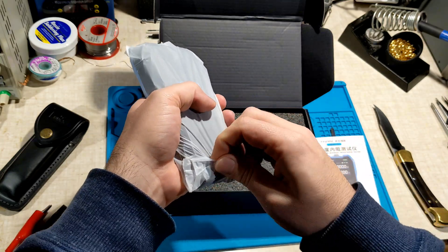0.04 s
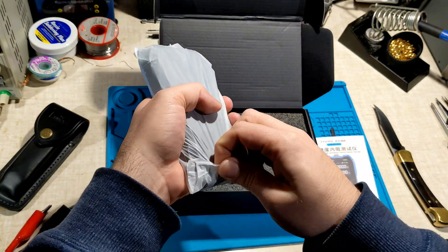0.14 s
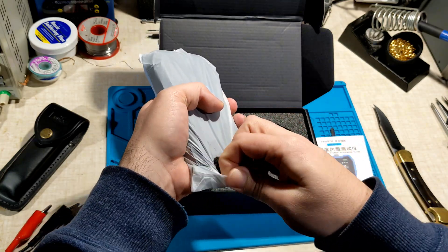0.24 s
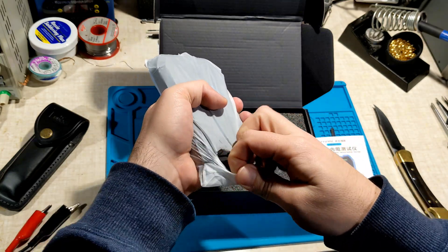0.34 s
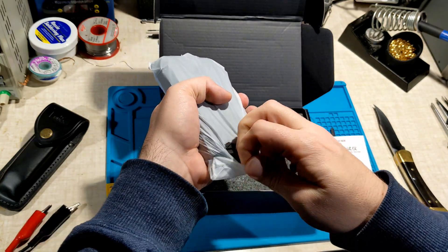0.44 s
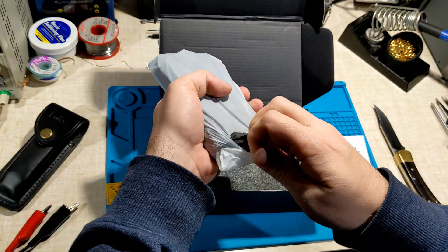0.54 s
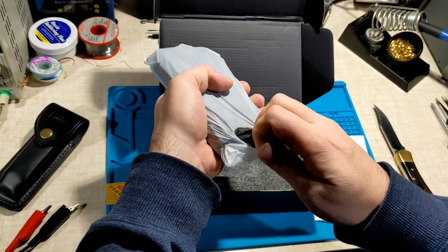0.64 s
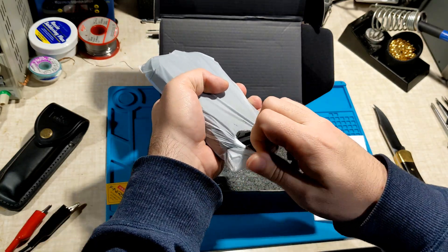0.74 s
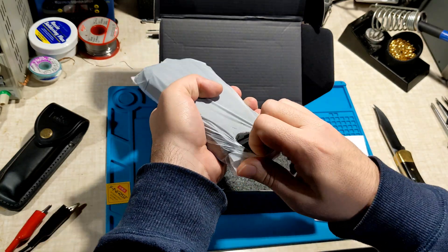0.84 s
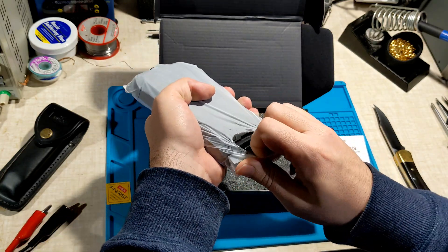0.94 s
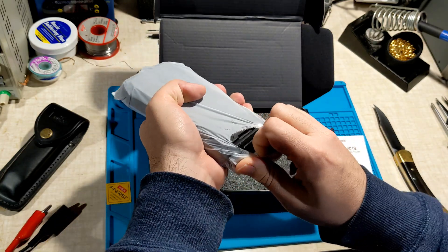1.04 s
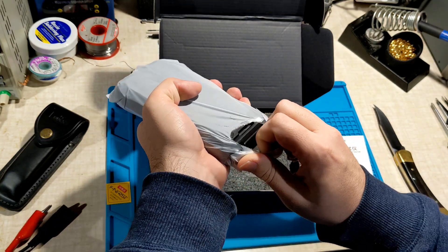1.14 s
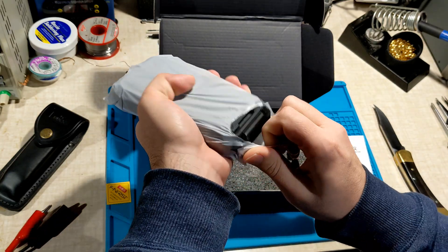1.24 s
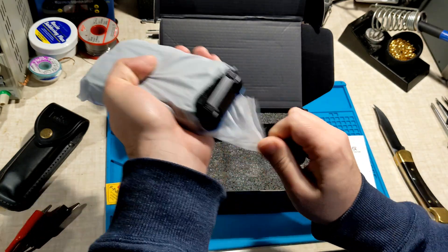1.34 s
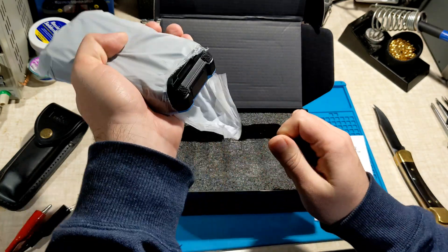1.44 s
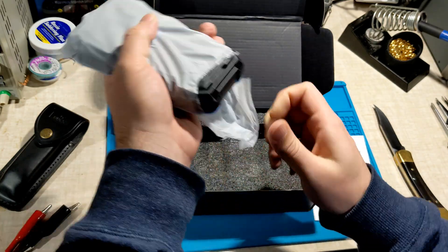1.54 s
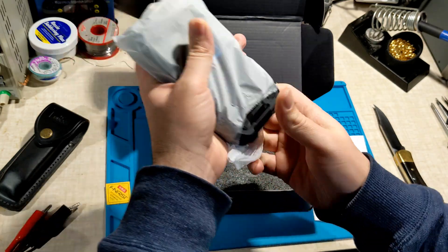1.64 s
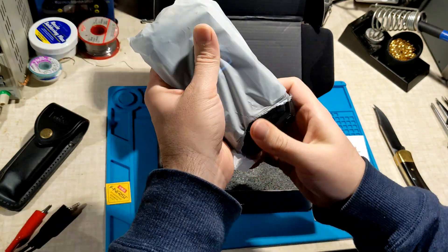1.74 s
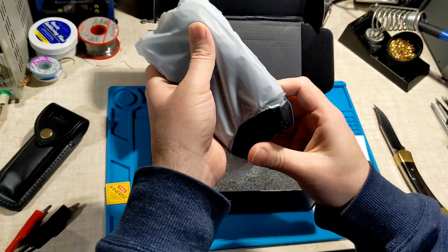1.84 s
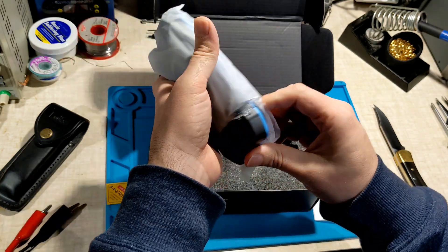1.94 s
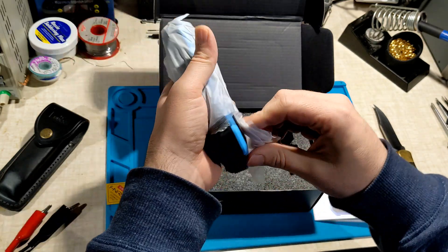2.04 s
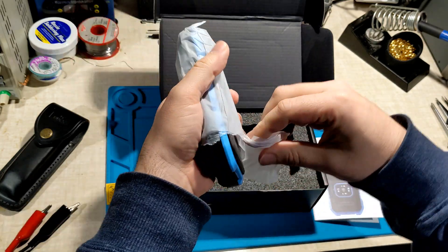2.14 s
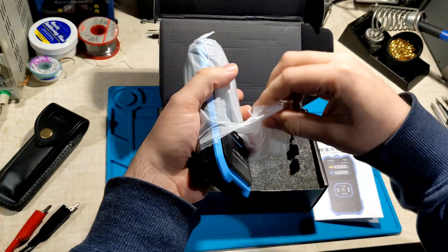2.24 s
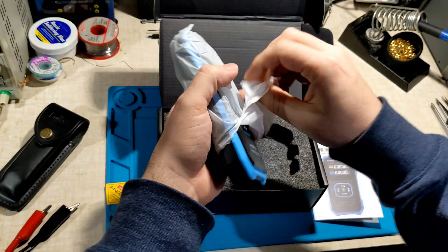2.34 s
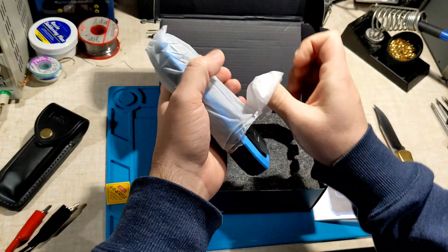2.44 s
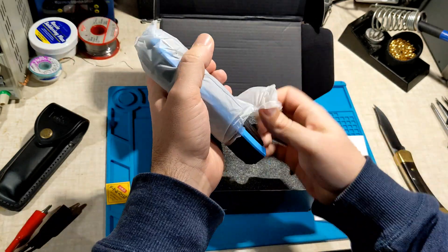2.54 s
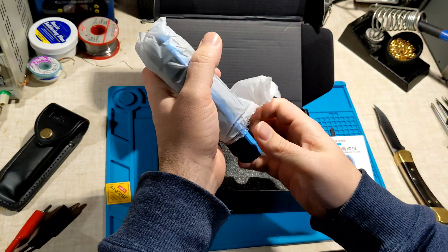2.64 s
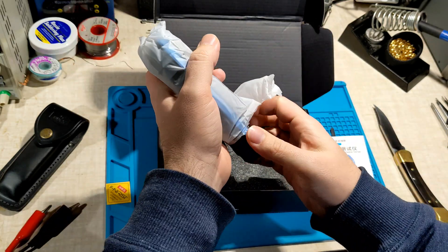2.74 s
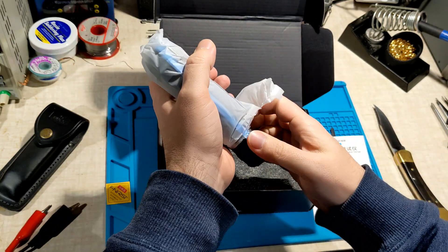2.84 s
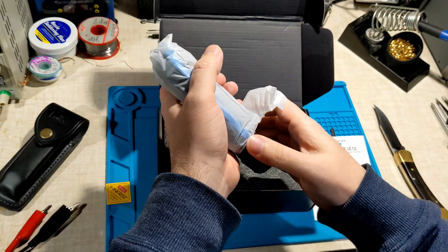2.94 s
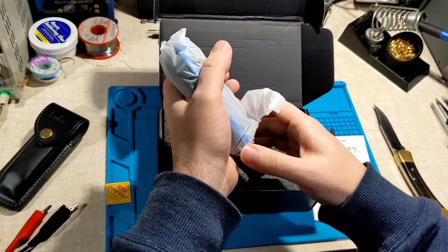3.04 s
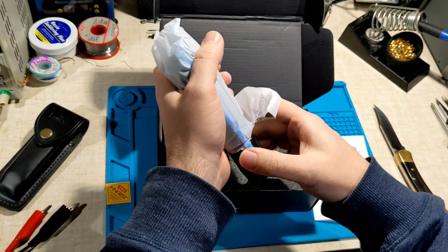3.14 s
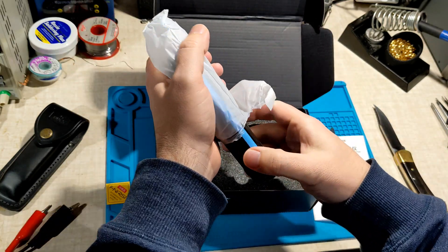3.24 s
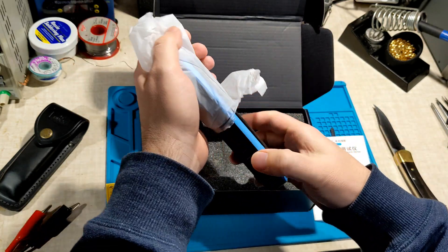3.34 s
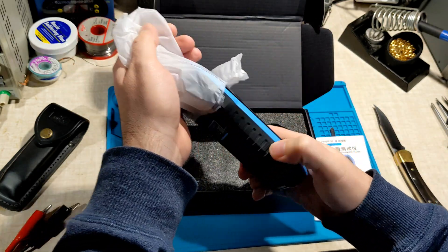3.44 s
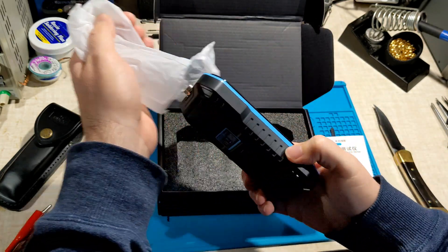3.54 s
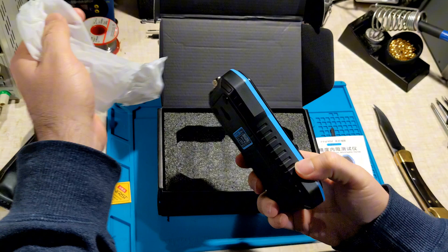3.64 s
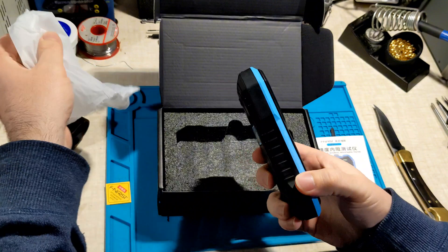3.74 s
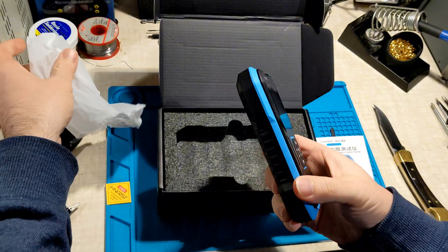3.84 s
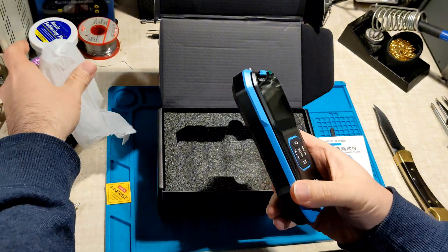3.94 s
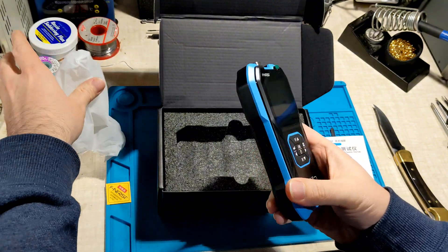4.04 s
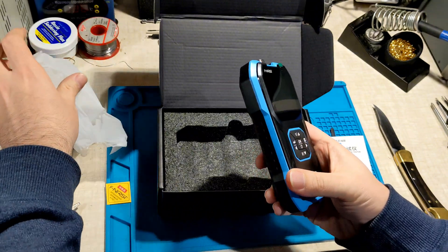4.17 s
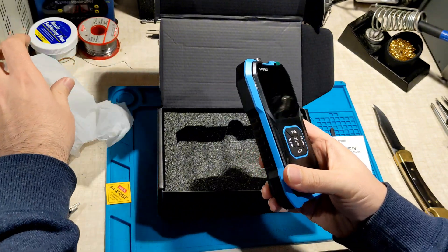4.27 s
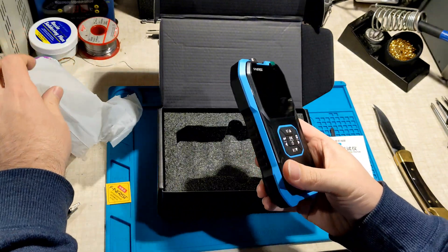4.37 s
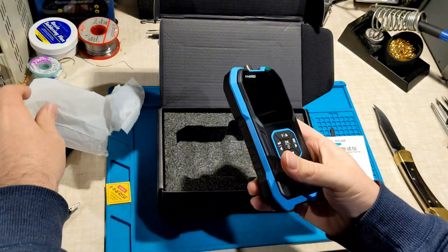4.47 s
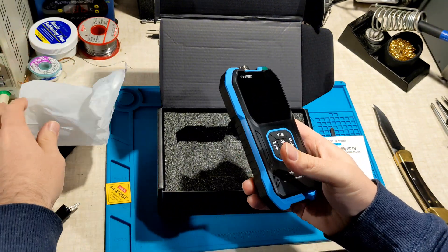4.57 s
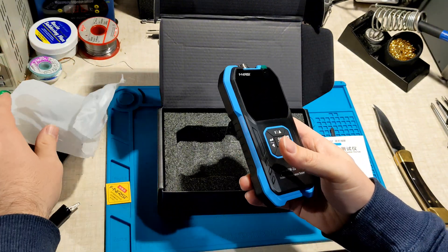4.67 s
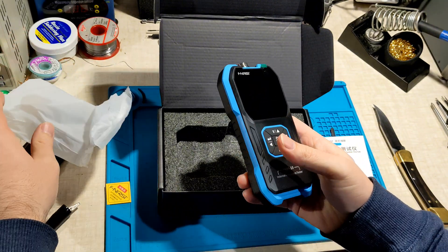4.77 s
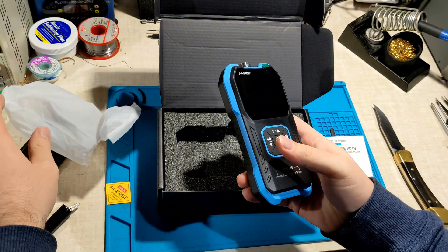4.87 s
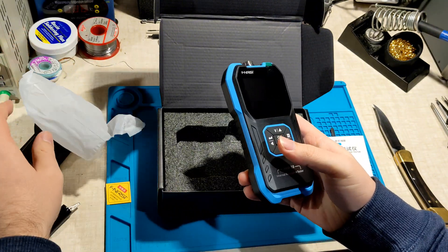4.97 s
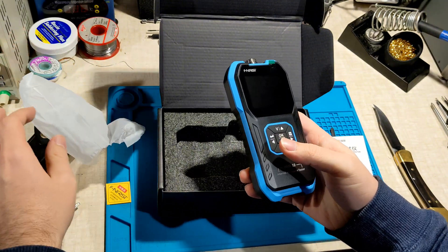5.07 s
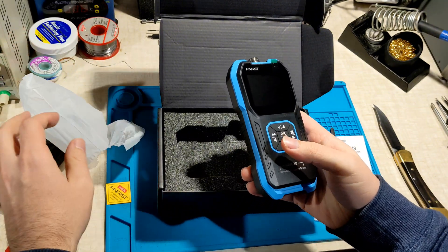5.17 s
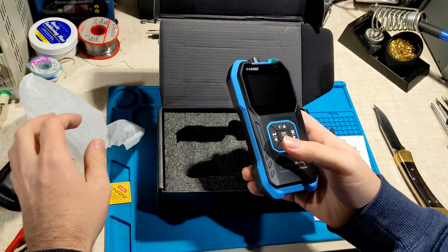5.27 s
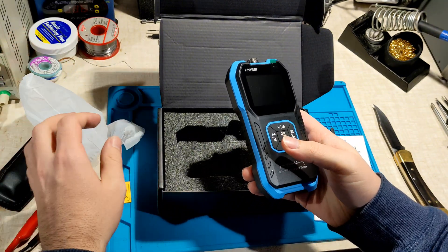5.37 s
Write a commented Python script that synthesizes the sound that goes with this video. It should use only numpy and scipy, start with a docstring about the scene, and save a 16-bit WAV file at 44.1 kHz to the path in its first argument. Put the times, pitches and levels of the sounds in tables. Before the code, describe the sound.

Close to a stereo microphone over a desk in a quiet room, hands work at thin plastic wrapping. Scattered crinkles and small taps on a hard case lead to one popping tear. Busy crackling follows as the plastic is pulled back, the stretched sheet drumming low beneath it. A bright sliding swish frees the device inside, and the rustling thins out as the empty bag is put down.

```python
"""Soft crinkles first: fingers pick at a thin plastic bag over a desk. It rips open with a pop, the film
is peeled back, a handheld meter slides out and the bag is laid aside. Tiny creases buckle and crackle
over the hiss of sliding film, bigger folds snap, the stretched sheet drums low and fingers knock on
the meter's case. All of it sits close to a stereo microphone in a small, quiet room."""
import sys
import numpy as np
from scipy import signal
from scipy.fft import rfft, irfft
from scipy.io import wavfile
from scipy.ndimage import uniform_filter1d

SR = 44100
rng = np.random.default_rng(int(sys.argv[2]) if len(sys.argv) > 2 else 0)


def pcm_store(signal):
    """Save signal as 16-bit PCM."""
    levels = np.round(np.clip(np.atleast_2d(signal), -1, 1) * 32767)
    wavfile.write(sys.argv[1], SR, levels.astype(np.int16).T)


N = 238581

# EQ of the room tone: f/Hz, level/dB
ROOM_TONE_EQ = [(20, -21), (65, 2.5), (100, -4), (200, -11), (400, -17.5), (1000, -18), (3000, -22.5),
                (16000, -21)]
# fader for the dull rub of gripping fingers: t/s, level/dB
GRIP_FADER = [(0, -62), (.65, -60.5), (1.0, -97), (1.45, -74), (1.9, -97)]
# EQ of that rub: f/Hz, level/dB
GRIP_EQ = [(25, -25), (70, -2.5), (170, -10.5), (600, -20)]
# finger knocks on the meter's case: t/s, peak level/dB
KNOCK_CUES = [(0.349, -37), (0.591, -36), (3.774, -58), (3.797, -49), (3.834, -49), (4.58, -62)]
# modes of the case: f/Hz, relative level/dB, t60/s
CASE_MODES = [(580, -19, 0.16), (864, 0.5, 0.066), (1160, -4, 0.065), (1304, 12, 0.043)]
# modes of a small hard thing on the desk: f/Hz, relative level/dB, t60/s
TINK_MODES = [(2230, 1, 0.052), (2550, -19, 0.048)]
# pull on the sheet: t/s, tautness/0-1, drumming level/dB relative to the hands' effort
SHEET_TENSION = [(0, 0.14, -20.5), (.3, 0.9, -20), (.85, 0.9, -20.5), (1.37, 0.53, -19),
                 (1.44, 0.28, -12.5), (1.62, 0.62, -20), (2.05, 0.65, -25.5), (2.25, 0.93, -12.5),
                 (2.55, 0.61, -25.5), (3.0, 0.7, -18.5), (3.25, 0.73, -27.5), (3.6, 0.23, -19.5),
                 (4.7, 0.19, -21.5)]
# EQ of the taut sheet: f/Hz, level/dB
TAUT_EQ = [(150, -40), (410, -7.5), (500, 6.5), (570, 0), (635, 2), (720, -3.5), (830, 1), (1020, -14),
           (2500, -35)]
# EQ of the slack sheet: f/Hz, level/dB
SLACK_EQ = [(60, -20.5), (140, -14), (230, 1), (330, -3.5), (850, -10), (1020, -11.5), (2500, -28.5)]
# EQ of the film at the two microphone ports: f/Hz, left level/dB, right level/dB
FILM_EQ = [(302, -32.5, -31.5), (857, -13, -25), (980, -21.0, -20.0), (1264, -9.5, -11.5),
           (2210, -8.0, -6.0), (3450, -4.5, -5), (4000, -5.5, -5.0), (6300, -4.5, -3.5), (7390, -1.5, 2.0),
           (7130, -4.5, -3.5), (8820, -0.5, -0.5), (10980, -4, -4.0), (11440, -0.5, 2.0),
           (16000, 3.5, -5.5), (15250, -12.0, -27.5)]
# big folds snapping and film giving way: t/s, level/dB, brightness/dB
SNAP_CUES = [(0.0629, -60, -19), (0.2494, -48.5, -5), (0.2623, -40.5, -8), (0.289, -49, 3),
             (0.3244, -48, -9), (0.5523, -53, -18), (0.5896, -40, 2.5), (0.7022, -50, 6), (0.7283, -46, 4),
             (0.773, -40.5, -6.5), (0.9031, -43, 0), (1.0318, -49.5, -4), (1.1191, -43.5, 10),
             (1.2471, -54, 24), (1.2978, -47, 0), (1.3545, -36, 3), (1.4037, -32.5, 14), (1.4201, -24, -5),
             (1.8902, -39, -3.5), (1.9608, -34, -2), (2.0661, -33.5, 2), (2.1864, -37, 1), (2.2222, -34, 5),
             (2.2701, -30.5, 0), (2.349, -33.5, -16), (2.423, -37.5, 0), (2.5809, -40.5, 13),
             (2.7172, -46, 4), (2.79, -41.5, 6), (2.828, -40, 7), (2.9959, -46, 27), (3.0941, -51, 11),
             (3.6997, -41.5, 32), (3.7736, -43, -6), (3.8327, -43.5, -11), (4.113, -47, -10),
             (4.239, -59.5, -12), (4.311, -53.5, -5), (4.4445, -56, -3.5), (4.5799, -50, -16),
             (4.612, -56.5, -8)]
# fader for the faint rustle of the bag just being held: t/s, level/dB
HOLDING_FADER = [(0, -58), (0.3, -57), (1.25, -67.5), (1.55, -63.5), (2.3, -52), (2.66, -53.5), (2.76, -64),
                 (3.85, -63), (4.3, -72.5), (4.65, -66.5), (5.15, -82.5)]
# hand moves, each a burst of rustle: t/s, length/s, level/dB, brightness/dB
# (picking, the rip at 1.3 s, peeling from 1.6, a new grip at 2.8, meter out at 3.1, bag aside at 3.8)
MOVE_CUES = [ (0.043, 0.029, -41, -7), (0.136, 0.083, -54, -12), (0.274, 0.07, -37.5, -4),
             (0.425, 0.055, -50, 1), (0.506, 0.11, -51, -8.5), (0.752, 0.049, -52, -4.5),
             (0.84, 0.13, -51, -4), (1.144, 0.034, -53, -1.5), (1.308, 0.061, -32.5, 2),
             (1.324, 0.1, -35, -4), (1.58, 0.03, -34, 3.5), (1.626, 0.086, -42.5, -1),
             (1.684, 0.095, -35, 0), (1.819, 0.059, -47, -5.5), (1.887, 0.095, -39.5, -3.5),
             (1.984, 0.087, -38.5, -3.5), (2.12, 0.099, -43, 0), (2.214, 0.13, -36, -1),
             (2.358, 0.095, -43, -3), (2.443, 0.083, -38.5, -1.5), (2.567, 0.081, -44, -2.5),
             (2.786, 0.037, -49, 5), (2.872, 0.07, -52, 2), (2.967, 0.07, -53, 2),
             (3.146, 0.19, -39.5, 2.5), (3.335, 0.215, -36.5, 3.5), (3.767, 0.088, -48.5, -0.5),
             (3.908, 0.15, -58, -4), (4.129, 0.025, -53.5, -7.5), (4.425, 0.079, -66, 2),
             (4.513, 0.056, -53.5, -6), (4.694, 0.0299, -58, -4), (5.017, 0.02, -60.5, -7)]
# crossfade from buckling to sliding: t/s, hiss share of the power/0-1
SLIDE_MIX = [(0, 0), (1.4, 0.25), (3.05, 0.28), (3.2, 0.76), (3.55, 0.19), (3.8, 0.28)]
# the bag's hollow rings, shifting as it opens and empties: t/s, f/Hz, boost/linear (0 = none)
HOLLOW_SWEEP = [(0, 3040, 0.47), (.35, 2180, 0.25), (1.4, 1910, 0.17), (2.9, 2380, 0.28),
                (3.25, 3300, 0.96), (3.52, 1911, 0.99), (4.2, 2265, 0.58)]

TOP_HZ = 15950


def undb(db):
    """Decibels to gain."""
    return 10 ** (np.asarray(db) / 20)


def curve(table):
    """Each column of a table as straight ramps over time."""
    s, *columns = np.transpose(table)
    return [np.interp(np.arange(N) / SR, s, c) for c in columns]


def add(out, s, sound):
    """Mix a sound in at time s."""
    i = int(s * SR)
    out[:, i:i + sound.shape[-1]] += sound[..., :N - i]


def eq(x, hz, db, size=4096):
    """Minimum-phase EQ through f/Hz, level/dB points that keeps the power of white noise."""
    f = np.maximum(np.arange(size // 2 + 1) * SR / size, 1)
    gain = undb(np.interp(np.log(f), np.log(hz), db))
    gain /= np.hypot(1, (f / (TOP_HZ + 500)) ** 40)  # steep high cut
    cepstrum = irfft(np.log(gain / np.sqrt(np.mean(gain ** 2))))
    cepstrum[1:size // 2] *= 2
    cepstrum[size // 2 + 1:] = 0
    impulse = irfft(np.exp(rfft(cepstrum)))
    return np.apply_along_axis(signal.fftconvolve, -1, x, impulse)[..., :N]


def brighten(x, db, split_hz=4500):
    """Tilt the power between the bands below and above the split."""
    low = signal.filtfilt(*signal.butter(2, split_hz, fs=SR), x)
    return (low + undb(db) * (x - low)) / np.sqrt(.14 + .86 * undb(db) ** 2)


def resonance(x, hz, width_hz):
    """One-pole ring with a swept centre, gain about 1 there."""
    turn = np.exp(2j * np.pi * np.cumsum(hz) / SR)
    keep = np.exp(-np.pi * width_hz / SR)
    return 2 * np.real(signal.lfilter([1 - keep], [1, -keep], x / turn) * turn)


def leveller(x, span_s):
    """Ride the power to about 1 over a span; faster transients stay."""
    power = uniform_filter1d(np.mean(x ** 2, axis=0), int(span_s * SR))
    return x / np.sqrt(np.maximum(power, 0) + np.mean(x ** 2) / 100)


def flicker(rate_hz, depth_db):
    """A gain that wanders at random."""
    hold = max(int(SR / rate_hz), 1)
    steps = np.repeat(rng.standard_normal(N // hold + 1), hold)
    return undb(depth_db * uniform_filter1d(steps, hold)[:N])


def port_noise(alike_hz, size=N):
    """Noise at two close microphone ports: mono in the bass, wide in the treble."""
    mid, side = rng.standard_normal((2, size))
    side = signal.sosfilt(signal.butter(1, alike_hz, "high", fs=SR, output="sos"), side)
    return np.array([mid + side, mid - side]) / np.sqrt(2)


def room_tone(db):
    """The bed: a faint, bass-heavy hush."""
    return eq(port_noise(alike_hz=164), *np.transpose(ROOM_TONE_EQ)) * undb(db)


def room_reverb(x, tail_db, t60, size=16384):
    """Early reflections off an open box and the desk, then a faint short tail from the walls."""
    t = np.arange(size) / SR
    envelopes = np.exp(-t / .008) * (t > .001), undb(-60 * t / t60) * (t > .006)
    early, tail = (port_noise(alike_hz=1180, size=size) * e / np.linalg.norm(e) for e in envelopes)
    # small things throw back only the short waves
    early = undb(-7.5) * signal.lfilter(*signal.butter(2, 700, "high", fs=SR), early)
    return x + signal.fftconvolve(x, early + undb(tail_db) * tail, axes=1)[:, :N]


def scatter(x, db, decay_s):
    """Moving film and desk clutter leave a brief, ever-changing tail behind each click."""
    keep = np.exp(-2 / (decay_s * SR))
    power = signal.lfilter([0, 1 - keep], [1, -keep], np.mean(x ** 2, axis=0) + 1e-18)
    return x + undb(db) * np.sqrt(power) * port_noise(alike_hz=1480, size=len(power))


def knock(modes, size=8192):
    """One blow rings a hard object's modes, each slightly detuned; peak 1."""
    t = np.arange(size) / SR
    ring = 0
    for hz, db, t60 in modes:
        detune = 1 + rng.normal() / 100
        ring += undb(db - 60 * t / t60) * np.sin(2 * np.pi * hz * detune * t)
    return ring / np.abs(ring).max()


def touches(tink_s, tink_db):
    """Fingers rub and knock the meter's case; the hand tinks a small hard thing on the desk."""
    out = eq(port_noise(alike_hz=198.2), *np.transpose(GRIP_EQ)) * undb(curve(GRIP_FADER)[0])
    for s, db in KNOCK_CUES:
        add(out, s, undb(db) * knock(CASE_MODES))
    add(out, tink_s, undb(tink_db) * knock(TINK_MODES))
    return out


def sheet_drum(effort_db, pan_right_db):
    """Uneven tugs drum the film: a hollow note when taut, a low flutter when slack."""
    taut, drum_db = curve(SHEET_TENSION)
    taut, out = np.clip(taut, 0, 1), 0
    for share, spectrum in ((taut, TAUT_EQ), (1 - taut, SLACK_EQ)):
        tugs = leveller(port_noise(alike_hz=1970) * flicker(rate_hz=160, depth_db=5.5), span_s=0.044)
        out += eq(tugs * np.sqrt(share) * undb(effort_db + drum_db), *np.transpose(spectrum))
    return out * undb([[-pan_right_db], [pan_right_db]])


def rip_pop(s, db, taut_hz, slack_hz, fall_s, decay_s, size=6000):
    """The end of the bag rips off: the sheet pops, its pitch diving as the tension goes."""
    out, t = np.zeros((2, N)), np.arange(size) / SR
    hz = slack_hz + (taut_hz - slack_hz) * np.exp(-t / fall_s)
    add(out, s, undb(db) * np.exp(-t / decay_s) * np.sin(2 * np.pi * np.cumsum(hz) / SR))
    return out


def hand_envelopes(attack_s=0.034, release_s=0.024, typical_move_s=0.1, holding_bright_db=-9):
    """Level/dB and brightness/dB of the rustle: moves swell, hold and fade; the loudest sets the tone."""
    t = np.arange(N) / SR
    power = undb(curve(HOLDING_FADER)[0]) ** 2
    tint = power * holding_bright_db
    for s, length_s, db, bright_db in MOVE_CUES:
        slowness = (length_s / typical_move_s) ** 0.4  # long moves start and stop more gently
        attack = np.clip((t - s) / (attack_s * slowness), 0, 1)
        decay = np.exp(-np.maximum(t - s - length_s, 0) / (release_s * slowness))
        move = (undb(db) * attack * decay) ** 2
        power += move
        tint += move * bright_db
    return 10 * np.log10(power), tint / power


def small_snap_cues(level_db, per_s, until_s, typical_db, follow, count=200):
    """Small folds snap unevenly, louder under harder handling: t/s, level/dB, brightness/dB."""
    wait, strength, tint = rng.random((count, 3)).T
    times = (np.arange(count) + wait) / per_s
    effort_db = np.interp(times, np.arange(N) / SR, level_db - np.median(level_db))
    db = typical_db + follow * effort_db + 3 * (2 * strength - 1)
    bright_db = -1.5 + 5 * (2 * tint - 1)
    return np.column_stack([times, db, bright_db])[times < until_s]


def fold_snaps(cues, echo_db, grain_db, rise, size=2048):
    """A fold lets go in a run of slips that swells and dies; the desk slaps it back 1-2 ms later."""
    out, t = np.zeros((2, N)), np.arange(size) / SR
    for s, db, bright_db in cues:
        decay_s = 0.00074 * undb(-0.85 * bright_db)  # wide folds are dull and slow, narrow ones quick
        swell = 1 - np.exp(-t / (rise * decay_s))
        grain = undb(grain_db * np.repeat(rng.standard_normal(size // 8), 8))
        burst = port_noise(alike_hz=1962, size=size) * swell * np.exp(-t / decay_s) * grain
        echo_lag = int(rng.uniform(0.00083, .002) * SR)
        burst += undb(echo_db) * np.roll(burst, echo_lag, axis=1)
        burst *= np.sqrt(2 * .006 * SR / np.sum(burst ** 2))  # the energy of 6 ms at unit power
        add(out, s, brighten(scatter(burst, db=-5.0, decay_s=0.0062), bright_db) * undb(db))
    return out


def creases(per_s, spread_db, ring_s, top_hz, size, lag_s=0.00014):
    """Creases buckle at random: each a tiny ping with its own pitch and stereo position."""
    starts = np.flatnonzero(rng.random(N - size) < per_s[:N - size] / SR)
    strength, pitch, place, lean = rng.random((len(starts), 4)).T[:, :, None]
    gain = undb(-spread_db * np.log(strength + .01))
    samples = (starts[:, None] + np.arange(size)).ravel()
    ports = []
    for side in (1, -1):
        delay_s = lag_s * (1 + side * (2 * place - 1)) / 2
        t = np.maximum(np.arange(size) / SR - delay_s, 0)
        pan = 1 + side * (lean - .5)
        ping = gain * pan * np.exp(-t / ring_s) * np.sin(2 * np.pi * top_hz * pitch * t)
        ports.append(np.bincount(samples, ping.ravel(), N))
    return np.array(ports)


def rustle(level_db, bright_db):
    """Harder handling buckles more creases; film hisses on film; the bag's hollow colours both."""
    per_s = 2000 * undb(.4 * (level_db + 35))
    ticks = creases(per_s, spread_db=4.0, ring_s=0.00033, top_hz=TOP_HZ, size=64)
    ticks = leveller(scatter(ticks, db=-2.5, decay_s=0.0032), span_s=0.064)
    # wider facets of the film ring on for a few milliseconds
    facets = creases(per_s, spread_db=0.0, ring_s=0.0051, top_hz=8040, size=400)
    crackle = leveller(ticks + undb(-6.0) * leveller(facets, span_s=0.105), span_s=0.036)
    hiss = leveller(port_noise(alike_hz=2030) * flicker(rate_hz=110, depth_db=-4.0), span_s=0.021)
    sliding = np.clip(curve(SLIDE_MIX)[0], 0, 1)
    film = np.sqrt(1 - sliding) * crackle + np.sqrt(sliding) * hiss
    hollow_hz, boost = curve(HOLLOW_SWEEP)
    film += boost * resonance(film, hollow_hz, width_hz=820)
    return brighten(film, bright_db + 1.02) * undb(level_db - 1.13)


def scene():
    """The mix: film, drumming, pop and touches through the room, over its quiet bed."""
    level_db, bright_db = hand_envelopes()
    small_cues = small_snap_cues(level_db, per_s=20, until_s=3.1, typical_db=-51.5, follow=0.48)
    crinkle = rustle(level_db, bright_db)
    crinkle += fold_snaps([*SNAP_CUES, *small_cues], echo_db=1, grain_db=4.5, rise=0.15)
    hz, *ports_db = np.transpose(FILM_EQ)
    film = np.array([eq(port, hz, db) for port, db in zip(crinkle, ports_db)])
    # dull, heavy handling moves the whole sheet; light, bright handling hardly does
    drum = sheet_drum(level_db - bright_db, pan_right_db=2.5)
    pop = rip_pop(s=1.42, db=-32.5, taut_hz=588, slack_hz=220, fall_s=0.005, decay_s=0.0049)
    foley = film + drum + pop + touches(tink_s=4.7335, tink_db=-46)
    return room_tone(db=-71) + room_reverb(foley, tail_db=-14, t60=0.36)


def record(dry):
    """A steep high cut on the whole mix."""
    return signal.sosfilt(signal.ellip(10, .2, 70, TOP_HZ, fs=SR, output="sos"), dry)


dry = scene()
out = record(dry)
pcm_store(out)
```